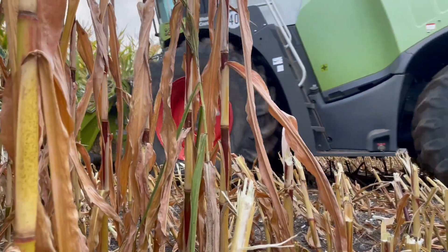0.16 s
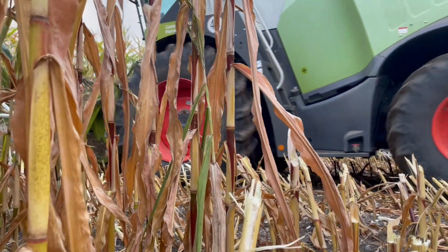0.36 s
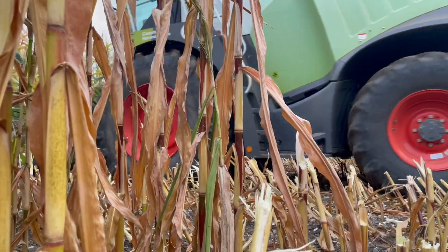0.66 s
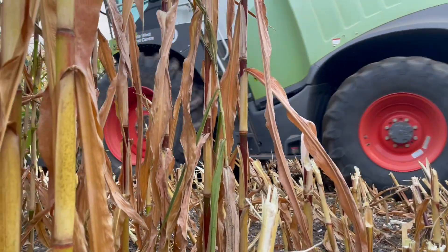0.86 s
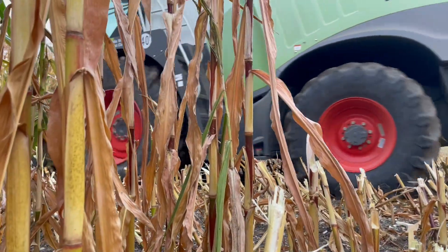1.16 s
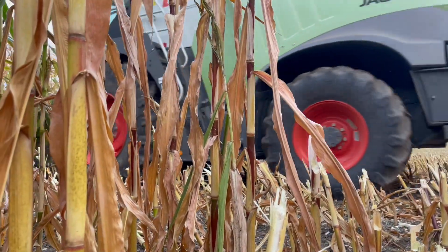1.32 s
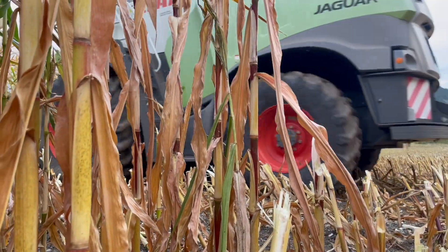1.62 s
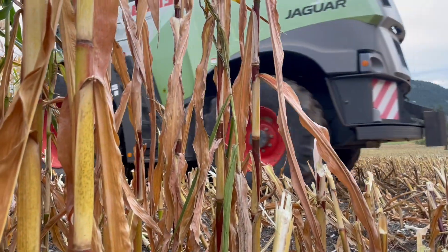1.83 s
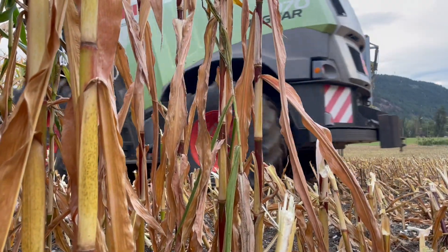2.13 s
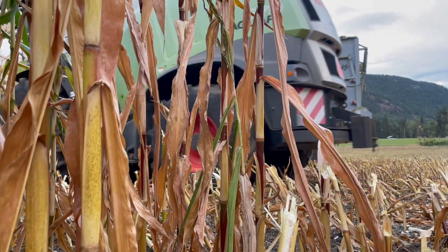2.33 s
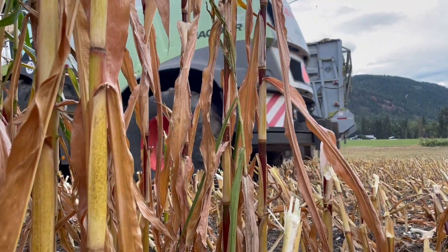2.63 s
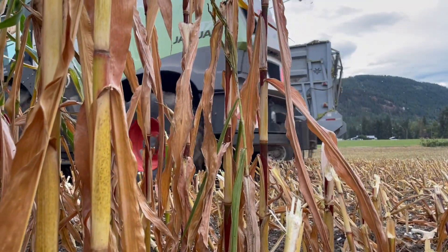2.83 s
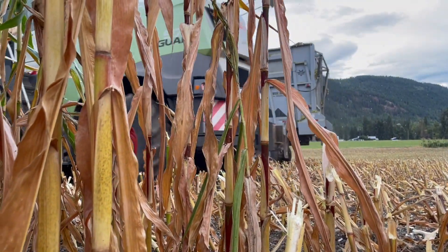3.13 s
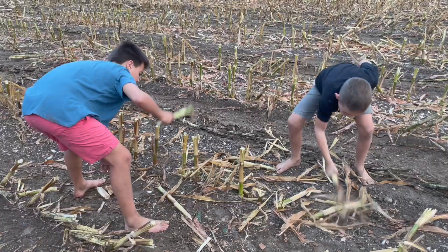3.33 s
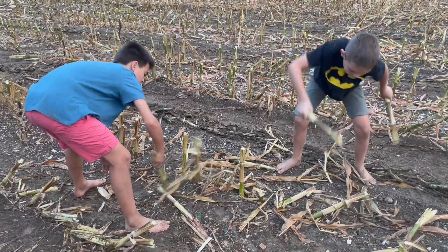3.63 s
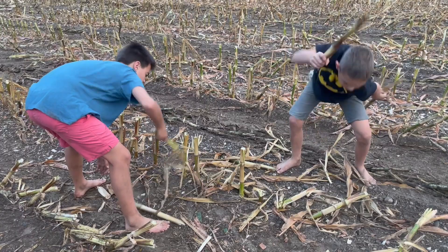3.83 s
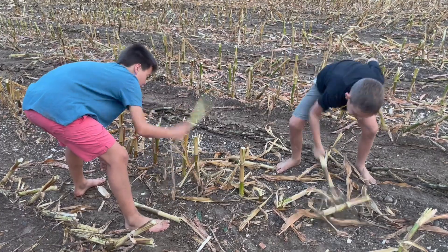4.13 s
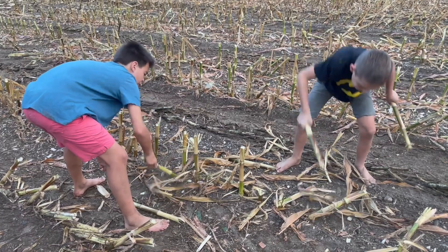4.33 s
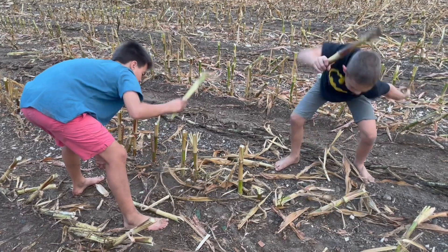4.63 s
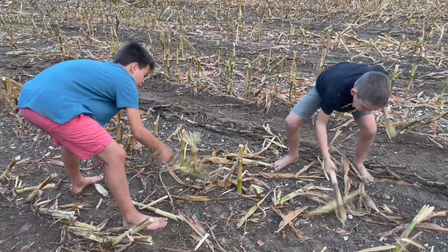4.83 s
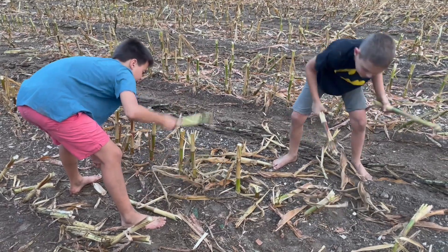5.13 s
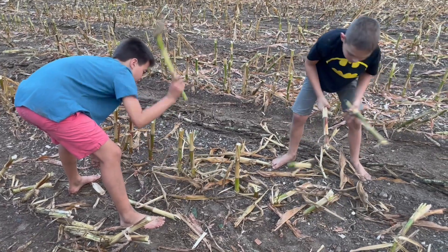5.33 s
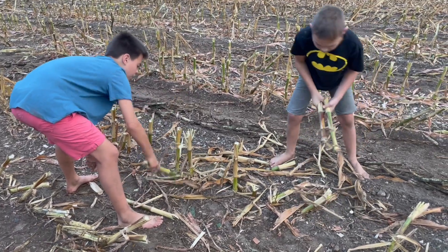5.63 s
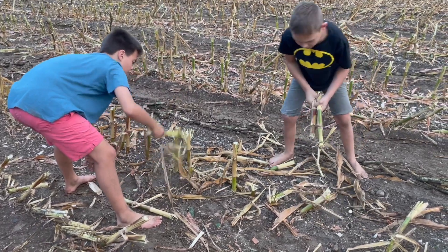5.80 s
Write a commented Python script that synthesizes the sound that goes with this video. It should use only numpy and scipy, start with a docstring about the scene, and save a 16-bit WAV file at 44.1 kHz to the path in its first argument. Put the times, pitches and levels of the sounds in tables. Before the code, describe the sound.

A big harvesting machine drones and howls close by, cuts off abruptly, then dry stalks crack and thud on stubbly soil.

```python
"""Forage harvester, then stalks on stubble

A forage harvester passes close by: sines give the diesel drone and the howl of the knife drum,
shaped noise the rumble, roar and hiss of shredded crop. It ends abruptly. Then dry stalks are beaten
on the soil: noise bursts crack and spray husks, falling tones thud, decaying modes ring, and random
clicks splinter. A far engine of three harmonics hums, squeals glide and a breeze brushes the microphone.
"""
import sys
import numpy as np
from scipy import signal
from scipy.fft import rfft, irfft
from scipy.io import wavfile

SR = 44100
rng = np.random.default_rng(int(sys.argv[2]) if len(sys.argv) > 2 else 0)


def persist_wave(psi):
    """Save psi, clipped to +-1, as 16-bit WAV."""
    counts = np.round(np.clip(psi, -1, 1) * 32767).astype(np.int16)
    wavfile.write(sys.argv[1], SR, np.atleast_2d(counts).T)


N = 262836
TIME = np.arange(N) / SR  # seconds
BINS = np.maximum(np.arange(N // 2 + 1) * SR / N, 1)  # hertz
FIELD_START_S = 3.25

# Stalk blows. Each row: start in seconds, crack level in dB, crack decay constant in seconds, crack treble
# in dB against its body, thud level in dB, contact time in seconds, thud glide constant in seconds,
# stalk ring level in dB, ring pitch as a ratio, place of contact from 0 to 1, stump pitch in Hz,
# stump level in dB.
STALK_BLOWS = [(3.3295, -5, 0.0029, -1, -9, 0.0024, .0024, -24, 0.97, 0.32, 2360, -25),
               (3.6056, -17.5, 0.0045, 0, -31, 0.0027, 0.0026, -33, 1.03, 0.36, 2200, -30),
               (4.0659, -12, 0.0043, 7.5, -6.5, 0.0022, 0.0027, -17, 1.03, 0.02, 1830, -22),
               (4.1711, -12.5, 0.0065, -10, -46, 0.0023, 0.0026, -30, 0.87, 0, 1300, -27),
               (4.8146, -14, 0.006, 8.5, -8, 0.0022, 0.00195, -23, .98, 0.24, 985, -19),
               (5.4262, -14, 0.0042, -2.5, -15.5, 0.0022, 0.0023, -23.5, 0.97, .125, 663, -23)]


def from_db(db):
    """A level in decibels is 20 times the logarithm of an amplitude gain."""
    return 10 ** (np.asarray(db) / 20)


def rms_one(x):
    """Mean-square normalisation gives unit power."""
    return x / np.sqrt(np.mean(x ** 2) + 1e-20)


def in_time(rows):
    """Linear interpolation in time brings each column of a curve to every sample."""
    s, *columns = np.transpose(rows)
    return [np.interp(TIME, s, column) for column in columns]


def in_hz(rows):
    """Interpolation over log frequency brings each column of a spectrum to every bin."""
    hz, *columns = np.transpose(rows)
    return [np.interp(np.log(BINS), np.log(hz), column) for column in columns]


def drift(rate_hz):
    """Low-passed white noise of unit spread wanders at about the given rate."""
    white = rfft(rng.standard_normal(N))
    return rms_one(irfft(white / (1 + (BINS / rate_hz) ** 2), N))


def spread(pair):
    """Mid-side mixing of two unrelated signals sets the stereo coherence at each frequency."""
    # Each row: frequency in Hz, left-right likeness from 0 to 1.
    likeness = [(30, .999), (60, 0.993), (150, 0.98), (350, 0.96), (700, 0.75), (1400, 0.36), (3000, 0.8),
                (5500, 0.27), (7000, 0.7), (8500, 1), (10500, 0.79), (12400, 0.8), (13200, 1)]
    alike = np.clip(in_hz(likeness)[0], 0, 1)
    mid, side = rfft(pair)
    return irfft(np.sqrt(1 + alike) * mid + np.sqrt(1 - alike) * side * [[1], [-1]], N)


def coloured(spectrum, grain_db=0):
    """Spectral shaping colours stereo noise; uneven grain makes it a mass of tiny fractures."""
    sizes = from_db(grain_db * np.clip(drift(900), -2.5, 2.5))
    white = rng.standard_normal((2, N)) * sizes
    return rms_one(spread(irfft(rfft(white) * from_db(in_hz(spectrum)[0]), N)))


def turning(hz):
    """Phase is the running integral of a changing rotation rate."""
    return 2 * np.pi * np.cumsum(hz) / SR


def bell(centre_s, width_s):
    """A Gaussian envelope rises and falls smoothly around a moment."""
    return np.exp(-np.minimum(.5 * ((TIME - centre_s) / width_s) ** 2, 50))


def swells(rows):
    """Incoherent swells add in power; each row is a moment, a half width and a level."""
    return np.sqrt(sum((from_db(db) * bell(s, width)) ** 2 for s, width, db in rows))


def swirl(x, depth, count=4):
    """Comb filtering by sliding echoes off moving panels and the soil makes the colour wander."""
    echoes = 0
    for k in range(count):
        lag_s = .0006 * 1.9 ** k + .00007 * drift(2.5)
        delayed = np.array([np.interp(TIME - lag_s, TIME, channel) for channel in x])
        echoes = echoes + delayed * (-1) ** k
    return rms_one(x + depth * echoes)


def flares(multiple):
    """A Gaussian gain lets one of the drum's tones flare up briefly."""
    # Each row: multiple of the knife rate, centre in seconds, half width in seconds, level in dB.
    tone_flares = [(1, 0.897, 0.057, -17.5), (1, 1.326, 0.036, -21.5), (1, 2, 0.043, -21),
                   (4, 0.71, 0.056, -31), (4, 1.174, 0.062, -29.5), (5, 0.98, .2, -36),
                   (6, 1.54, 0.14, -33.5), (8, 1.7, 0.38, -41)]
    return swells([swell for k, *swell in tone_flares if k == multiple])


def knife_drum(phase, sag_hz, howl_db, smear=.65, flutter_db=4.0, waver_db=.8):
    """Periodic knife passes at the shear bar excite harmonics; uneven feed of crop makes them waver."""
    # Each row: multiple of the knife rate, level in dB relative to the common overtone level.
    overtones = [(3, -8), (4, -1), (5, -3), (6, -4.5), (7, -15.5), (8, -11), (9, -13), (10, -13)]
    labour_db_per_hz = 0.24  # the knife tone grows as a thick wad of crop slows the drum
    knife_db = -26.5 + labour_db_per_hz * sag_hz + 2 * np.clip(drift(1.9), -2, 2)
    upper_db = -35.5 - 1.0 * TIME  # sinks 1 dB per second as the front of the machine moves away
    tones = np.hypot(from_db(knife_db), flares(1)) * np.sin(phase + 0.16 * drift(28.0))
    tones += from_db(howl_db + waver_db * drift(8.5)) * np.sin(2 * phase + 0.027 * drift(1.5))
    for multiple, level_db in overtones:
        steady = from_db(upper_db + level_db + flutter_db * drift(18))
        gain = np.hypot(flares(multiple), steady)
        tones += gain * np.sin(multiple * phase + smear * drift(10.7))
    return np.sqrt(2) * tones  # makes the levels rms


def diesel(wobble=0.55, throb_db=1.5):
    """Cyclic firing makes tones that labour under changing load; a deep drive drone surges above them."""
    # Each row: engine or drive tone in Hz, level in dB before the common 2 dB cut.
    engine_tones = [(133.1, -23), (65.85, -36), (137.4, -32)]
    # Each row: centre of a surge in seconds, level in dB.
    drone_surges = [(.15, -21), (.53, -21), (.77, -17), (1.08, -21), (1.24, -18), (1.54, -18), (2.1, -19.5),
                    (2.84, -19.5), (3.1, -19.5)]
    drone_hz, drone_db, surge_half_width_s = 83.15, -29, 0.034
    tones = 0
    for hz, db in engine_tones:
        gain = from_db(db - 2 + throb_db * drift(7.2))
        tones = tones + gain * np.sin(2 * np.pi * hz * TIME + wobble * drift(4.9))
    surge = swells([(s, surge_half_width_s, db) for s, db in drone_surges])
    drone = np.sin(2 * np.pi * drone_hz * TIME + wobble * drift(6.9))
    return np.sqrt(2) * (tones + np.hypot(from_db(drone_db), surge) * drone)


def whistles(flutter_db=3):
    """Frequency modulation by noise blurs the thin whistles of fast-turning parts."""
    # Each row: settled pitch in Hz, wander in Hz, level in dB.
    whistle_tones = [(3450, 38.8, -46.5), (5160, 105.9, -52), (11770, 117, -49.5), (13020, 131, -47.5)]
    speed = 1 - .02 * bell(0, .7)  # starts 2 % low and picks up over about 0.7 s
    tones = 0
    for hz, wander_hz, db in whistle_tones:
        phase = turning(hz * speed + wander_hz * drift(146.0))
        tones = tones + from_db(db + flutter_db * drift(3.4)) * np.sin(phase)
    return np.sqrt(2) * tones


def panels():
    """Hollow panels resonate in the rush of crop, each heard while it faces the microphone."""
    # Each row: resonance in Hz, bandwidth in Hz, centre in seconds, half width in seconds, level in dB.
    resonances = [(1670, 160, 1.8, 0.43, -41), (2620, 110, 1.72, 0.3, -35), (3420, 120, 1.076, 0.18, -40),
                  (3600, 227, 1.9, .2, -47), (5330, 380, 2.01, 0.063, -39.5), (3410, 161, 2.58, 0.15, -39),
                  (4500, 140, 2.8, 0.14, -38.5), (4930, 130, 2.9, .1, -54), (2540, 150, 2.85, 0.17, -39)]
    rush, out = spread(rng.standard_normal((2, N))), 0
    for hz, width_hz, s, width_s, db in resonances:
        ringing = signal.lfilter(*signal.iirpeak(hz, hz / width_hz, fs=SR), rush)
        out = out + from_db(db) * bell(s, width_s) * rms_one(ringing)
    return out


def machine_rumble():
    """Band-shaped noise of varying level is the machine's rumble."""
    # Each row: frequency in Hz, relative level per hertz in dB.
    rumble_colour = [(22, -29), (32, -24), (42, -6.5), (70, -2), (90, -2.5), (115, 0), (160, -2), (230, -4),
                     (330, -13), (480, -20), (900, -56.5)]
    # Each row: time in seconds, rumble level in dB.
    rumble_level = [(0, -16), (.7, -17.5), (1.3, -15.5), (1.75, -17.5), (2.15, -16), (2.55, -18.5),
                    (2.8, -18.5), (3.05, -17.5)]
    return from_db(in_time(rumble_level)[0]) * coloured(rumble_colour)


def machine_roar(cuts):
    """Amplitude modulation by the cuts pulses a broad-band roar."""
    # Each row: frequency in Hz, relative level per hertz in dB.
    roar_colour = [(250, -7.5), (450, -3), (590, 1), (720, -1.5), (870, -8.5), (1100, -8), (1330, -16),
                   (1650, -11.5), (2100, -15.5), (2600, -14), (3050, -20.5), (3500, -17), (4400, -24.5),
                   (7000, -79)]
    level_db = -21.5 + .5 * TIME  # rises half a decibel per second
    return from_db(level_db) * swirl(coloured(roar_colour, grain_db=1.5), depth=0.11) * cuts


def crop_hiss(cuts):
    """Amplitude modulation makes shredded crop hiss in step with the knives; it swells in passing."""
    # Each row: frequency in Hz, relative level per hertz in dB.
    hiss_colour = [(2500, -2), (4000, 5.5), (5000, 3), (5600, 0), (7500, -3), (10500, 6.5), (12600, 2),
                   (13300, -1.5), (14500, -18), (15600, -49)]
    level_db = -34 + 2 * bell(1.36, 0.33)  # 2 dB more as the crop stream is nearest
    return from_db(level_db) * swirl(coloured(hiss_colour, grain_db=3.0), depth=0.76) * cuts


def fan_rush():
    """Turbulent air is broad-band noise, louder as each cooling grille comes into line."""
    # Each row: frequency in Hz, relative level per hertz in dB.
    fan_colour = [(1500, -20), (2200, -6), (2620, 7.5), (3000, -3), (3480, -3), (4100, -7), (5000, -0.5),
                  (5700, -2.5), (7200, 4.5), (8600, -7.5), (10500, -5), (14000, -32)]
    # Each row: centre in seconds, half width in seconds, level in dB.
    grilles = [(2.74, 0.18, -30.5), (3.17, 0.14, -35.5)]
    return np.hypot(from_db(-39), swells(grilles)) * swirl(coloured(fan_colour), depth=0.37)


def harvester(chop=0.046):
    """Superposition of tones and noise, tied by the knives' shared phase, forms the machine."""
    # Knife drum. Each row: time in seconds, knives passing per second, level in dB of the howl at
    # twice that rate.
    drum = [(0, 196, -18), (.17, 201, -18), (.32, 195, -19), (.37, 198.2, -28), (.46, 198.2, -20.5),
            (.73, 197, -18.5), (.97, 195.5, -27.5), (1.13, 198, -35), (1.38, 197.8, -25.5),
            (1.62, 196, -22), (2.0, 197, -20), (2.35, 200, -20), (2.52, 198.7, -21.5), (2.8, 195.3, -20),
            (2.95, 196, -27.5), (3.2, 192, -30)]
    pass_end_s = 3.204
    knife_hz, howl_db = in_time(drum)
    phase = turning(knife_hz)
    cuts = 1 + chop * np.cos(2 * phase)
    tones = knife_drum(phase, knife_hz.mean() - knife_hz, howl_db) + diesel() + whistles()
    noises = machine_rumble() + machine_roar(cuts) + panels() + crop_hiss(cuts) + fan_rush()
    return (tones + noises) * np.clip((pass_end_s - TIME) / 0.00053, 0, 1)


def from_right(x, lag_s=0.0005):
    """Interaural-style delay: sound from the right reaches the left port a little later."""
    return np.array([np.interp(TIME - lag_s, TIME, x), x])


def far_engine(age, second_db=-52):
    """A harmonic series on a slowly rising firing rate makes the far engine's hum."""
    # Each row: time in seconds, level in dB of the fundamental.
    hum_level = [(3.25, -59), (3.78, -57), (3.87, -36.5), (4.5, -38.5), (4.8, -41.5), (5.2, -32.5),
                 (5.5, -53), (5.96, -40)]
    phase = turning(51.9 + 1.4 * age)  # firing rate in Hz, rising 1.4 Hz per second
    third_db = -46 - 6.5 * age  # fades 6.5 dB per second
    hum = 0
    for k, db in enumerate([in_time(hum_level)[0], second_db, third_db], 1):
        hum = hum + from_db(db) * np.sin(k * phase + 0.24 * drift(9.8))
    return np.sqrt(2) * from_right(hum)


def squeals(waver=0.018, flutter_db=3.0):
    """Frequency modulation makes thin far tones waver; each sets in, glides and dies."""
    # Each row: start in seconds, length in seconds, pitch in Hz, glide in Hz per second, level in dB.
    squeal_rows = [(3.775, 0.115, 1600, 350, -64), (4.01, 0.054, 2190, 200, -67),
                   (5.813, 0.16, 1835, -100, -61)]
    # Each row: partial's pitch ratio, level in dB relative to the squeal's level.
    partials = [(1, 2), (1.365, -8)]
    edge_s = 0.015  # onset and end
    out = 0
    for s, length_s, hz, glide, level_db in squeal_rows:
        age = np.clip(TIME - s, 0, length_s)
        phase = turning((hz + glide * age) * (1 + waver * drift(70)))
        tones = sum(from_db(db + flutter_db * drift(50)) * np.sin(ratio * phase) for ratio, db in partials)
        envelope = np.minimum(np.minimum(age, length_s - age) / edge_s, 1)
        out = out + from_db(level_db) * envelope * tones
    return np.sqrt(2) * out


def breeze_and_distance(age):
    """Turbulence at the microphone is low noise in gusts, over the wider noise of the open field."""
    # Each row: centre of a gust in seconds, half width in seconds, level in dB.
    gust_rows = [(4.25, 0.088, -44), (4.92, 0.043, -28), (5.08, 0.091, -30.5), (5.45, 0.12, -39.5),
                 (5.88, 0.13, -36)]
    # Each row: frequency in Hz, relative level per hertz in dB.
    wind_colour = [(20, -30), (30, -21), (44, 6), (60, 1), (110, 4.5), (160, -10), (250, -37), (500, -36),
                   (1200, -59)]
    # Each row: frequency in Hz, relative level per hertz in dB.
    field_colour = [(25, -16), (55, 1), (110, 4), (200, -11.5), (300, -15.5), (480, -12.5), (800, -17.5),
                    (1200, -23.5), (1750, -23.5), (2500, -33), (6000, -35.5), (12000, -40), (16000, -47)]
    gust = swells(gust_rows)
    breeze = gust * from_db(0.88 * drift(12)) * coloured(wind_colour)
    calm_db = -47.5 + 1.0 * age  # grows 1 dB per second along with the far engine
    field_gain = from_db(calm_db) + from_db(-24.5) * gust
    return breeze + field_gain * swirl(coloured(field_colour), depth=0.12)


def open_field():
    """Superposition of far engine, squeals, breeze and distant noise forms the background."""
    age = np.maximum(TIME - FIELD_START_S, 0)
    return far_engine(age) + squeals() + breeze_and_distance(age)


def burst(start_s, decay_s):
    """Exponential relaxation follows a sudden release of energy."""
    age = np.maximum(TIME - start_s, 0)
    return (1 - np.exp(-age / .0004)) * np.exp(-np.minimum(age / decay_s, 50))


def thud(start_s, swell_s, glide_s, end_hz, start_hz=1200, crumble=0.49):
    """An impact on yielding soil drops in pitch within milliseconds, unevenly as the soil crumbles."""
    age = np.maximum(TIME - start_s, 0)
    cycles = end_hz * age + (start_hz - end_hz) * glide_s * (1 - np.exp(-age / glide_s))
    push = age / swell_s * np.exp(1 - age / swell_s)  # peaks at swell_s
    return push * np.sin(2 * np.pi * cycles + crumble * drift(510))


def thuds():
    """Impulsive loading makes the soil thud under blows and soft landings; it radiates little deep bass."""
    # Stalk ends and feet landing softly. Each row: start in seconds, level in dB, final pitch in Hz.
    knocks = [(3.368, -23, 310), (3.616, -23, 247), (4.21, -23.5, 217), (5.051, -34, 129.6),
              (5.515, -31.5, 254)]
    soil_lag_s = 0.00056  # the soil is reached just after the crack
    out = 0
    for s, _, _, _, thud_db, contact_s, glide_s, *_ in STALK_BLOWS:
        out = out + from_db(thud_db) * thud(s + soil_lag_s, 2 * contact_s, glide_s, end_hz=158.3)
    for s, db, hz in knocks:
        out = out + from_db(db) * thud(s, 0.0028, 0.00042, hz, start_hz=580)
    return signal.sosfilt(signal.butter(2, 95, "high", fs=SR, output="sos"), out)


def stalk_ring(uneven_db=0.5):
    """Modal excitation depends on the place struck; the grip shifts the pitch and the stump adds a knock."""
    # Hollow maize stalk. Each row: mode in Hz before the blow's pitch ratio, relative level in dB,
    # time to fall 60 dB in seconds.
    stalk_modes = [(490, -3, 0.032), (690, -4, 0.046), (940, -9, 0.045), (1368, 3, 0.023),
                   (1980, 2.5, 0.049), (2285, -3, 0.028), (2690, 2, 0.024), (3690, 3, 0.028),
                   (4430, -8, 0.016)]
    node_share = 0.27  # what is left of a mode struck at its node
    stump_t60_s, crush_s = 0.05, .0006  # crush: time for the fibres to give way
    out, age = np.zeros(N + SR), TIME[:SR // 2]
    hz, db, t60 = np.transpose(stalk_modes)[:, :, None]
    mode = np.arange(1, len(stalk_modes) + 1)[:, None]
    for s, *_, ring_db, pitch, place, stump_hz, stump_db in STALK_BLOWS:
        uneven = uneven_db * rng.standard_normal(hz.shape)
        struck = np.hypot(np.sin(np.pi * mode * place), node_share) * from_db(ring_db + db + uneven)
        modes = struck * from_db(-60 * age / t60) * np.sin(2 * np.pi * hz * pitch * age)
        stump = from_db(stump_db - 60 * age / stump_t60_s) * np.sin(2 * np.pi * stump_hz * age)
        first = int(s * SR)
        out[first:first + len(age)] += (modes.sum(axis=0) + stump) * (1 - np.exp(-age / crush_s))
    return out[:N]


def ticks(spectrum, per_s=800, size_db=4.0):
    """A Poisson-like train of clicks: dry fibres break at random moments with widely different sizes."""
    born = rng.random(N) < per_s / SR
    sizes = from_db(size_db * np.minimum(rng.exponential(1, N), 3))
    clicks = born * rng.standard_normal((2, N)) * sizes
    return rms_one(spread(irfft(rfft(clicks) * from_db(in_hz(spectrum)[0]), N)))


def cracks():
    """Brittle fracture is a brief noise burst; a crossover sets each blow's treble against its body."""
    # Each row: frequency in Hz, relative level per hertz in dB.
    crack_colour = [(150, -28), (400, -14), (800, -8.5), (1200, -3), (1900, 0), (2700, 3), (3700, -5),
                    (5000, -2), (5700, -8.5), (7500, -2.5), (10000, -1), (12500, -4.5), (16000, -21)]
    body, edge = 0, 0
    for s, crack_db, decay_s, treble_db, *_ in STALK_BLOWS:
        crack = from_db(crack_db) * burst(s, decay_s)
        body, edge = body + crack, edge + from_db(treble_db) * crack
    fibres = rms_one(coloured(crack_colour, grain_db=2.0) + 0.22 * ticks(crack_colour, per_s=1300))
    dull = irfft(rfft(fibres) / (1 + (BINS / 4000) ** 6), N)
    return body * dull + edge * (fibres - dull)


def leaves():
    """Friction sets the level of dry litter: stirs build up and let go, and each blow leaves it settling."""
    # Each row: peak in seconds, build-up half width in seconds, level in dB.
    rustles = [(3.902, 0.023, -43), (4.13, 0.046, -42), (4.33, 0.19, -52), (4.5, 0.082, -46.5),
               (5.08, 0.13, -48), (5.33, 0.03, -52), (5.526, 0.021, -39), (5.69, 0.029, -49.5),
               (5.8, 0.058, -47.5), (5.89, .04, -57)]
    release_s = 0.017
    stirs = swells([(s, np.where(TIME < s, build_s, release_s), db) for s, build_s, db in rustles])
    settling = from_db(-51) * sum(burst(s, 0.088) for s, *_ in STALK_BLOWS)
    return np.hypot(from_db(-59.5), stirs) + settling  # a faint stirring never stops


def husk_spray(litter, uneven_db=2.0, tick_db=-5, spray_db=-2):
    """Many small collisions make granular noise: husks spray, splinters snap and leaves rustle."""
    # Each row: frequency in Hz, relative level per hertz in dB.
    husk_colour = [(100, 3), (230, 5), (500, 1), (1000, -5), (2200, 0), (3500, -3), (5700, -4), (7500, -1),
                   (10000, 3), (12500, 0.5), (16000, -15)]
    # Louder splinters. Each row: start in seconds, level in dB, decay constant in seconds.
    snaps = [(3.341, -14.5, 0.009), (3.368, -21.5, 0.0031), (3.375, -26, 0.0018), (3.6164, -10.5, 0.0045),
             (3.637, -24, 0.0064), (3.647, -29, 0.0035), (3.881, -30.5, 0.0041), (4.0863, -24, 0.0045),
             (4.135, -43, 0.0011), (4.184, -21, 0.011), (4.207, -34, 0.004), (4.441, -44, .002),
             (4.65, -50, 0.0012), (4.796, -28.5, 0.014), (4.8509, -18, 0.0013), (5.1605, -31.5, 0.0014),
             (5.3035, -37.5, .0019), (5.451, -37, 0.0023), (5.473, -29.5, 0.0041), (5.572, -39, 0.0013)]
    gain = litter * from_db(uneven_db * drift(61))
    for s, _, decay_s, *_ in STALK_BLOWS:
        gain = gain + from_db(-26) * burst(s, 3.9 * decay_s)  # outlasts the crack 3.9 times
    for s, db, decay_s in snaps:
        gain = gain + from_db(db) * burst(s, decay_s)
    spray = from_db(spray_db) * coloured(husk_colour, grain_db=1.0)
    return gain * (spray + from_db(tick_db) * ticks(husk_colour))


def splinters(size_db=2.0, clump_db=4, count=16):
    """Impulses ring damped resonators: splinters snap in clumps, with varied size, pitch and place."""
    per_s, low_hz, high_hz = 420, 1220, 12100
    low_t60_s = 0.0032  # of the lowest pitch; higher ones die faster in proportion
    born = rng.random(N) < per_s * from_db(clump_db * np.clip(drift(25), -2, 2)) / SR
    sizes = from_db(size_db * np.minimum(rng.exponential(1, N), 3))
    clicks = born * sizes * rng.standard_normal((2, N))
    dealt, out = rng.integers(0, count, N), 0
    for k, hz in enumerate(np.geomspace(low_hz, high_hz, count)):
        radius = from_db(-60 * hz / (low_hz * low_t60_s * SR))
        angle = 2 * np.pi * hz / SR
        poles = [1, -2 * radius * np.cos(angle), radius * radius]
        struck = clicks * (dealt == k) + 1e-18  # the offset avoids denormal numbers
        out = out + signal.lfilter([0, np.sin(angle)], poles, struck) * np.sqrt(hz)
    return rms_one(spread(out))


def scrapes(grain_db=2.5):
    """Sliding friction makes a dull, gritty rub as stalks and feet drag over the soil."""
    # Each row: centre in seconds, half width in seconds, level in dB.
    drags = [(4.46, 0.035, -54), (5.0, .06, -53.5), (5.524, 0.011, -46), (5.87, .09, -54)]
    # Each row: frequency in Hz, relative level per hertz in dB.
    soil_colour = [(300, -25), (650, -6), (950, -1), (1200, -3), (1500, 0), (2100, -5), (3500, -8),
                   (7000, -30)]
    return swells(drags) * coloured(soil_colour, grain_db=grain_db)


def stalks():
    """Superposition of fracture, impact, ringing and friction forms the beaten stalks."""
    litter = leaves()
    blows = cracks() + thuds() + stalk_ring()
    return blows + husk_spray(litter) + from_db(-7) * litter * splinters() + scrapes()


def scene():
    """Two scenes in succession: the passing machine, a very short gap, then the stubble field."""
    field_gain = np.clip((TIME - FIELD_START_S) / 0.0029 + 1, 0, 1)
    return harvester() + (open_field() + stalks()) * field_gain


def record(dry):
    """Linear filtering and soft saturation: ports differ, deep bass and top are cut, peaks are rounded."""
    # Microphone ports. Each row: frequency in Hz, left lead in radians, left minus right in dB.
    port_rows = [(20, 0, 0), (60, 0, -.3), (250, 0, -1.5), (480, .1, -2.5), (640, .5, -3), (850, .9, 1.8),
                 (1200, .3, 2.2), (1500, -.6, 2.6), (2050, -.3, .8), (2900, .9, 2.3), (4200, .7, 2.9),
                 (5200, .6, 2), (5800, -1.7, .3), (6500, -1, 0), (7600, -2.9, 0), (9000, -3.25, 0),
                 (10500, -4.3, 0), (13000, -6.28, 0)]
    lead, balance_db = in_hz(port_rows)
    ports = np.array([np.exp(1j * lead) * from_db(balance_db / 2), from_db(-balance_db / 2)])
    eased = dry * np.minimum(TIME / .005, 1)
    low_cut = 1 / np.sqrt(1 + (33 / BINS) ** 10)  # corner at 33 Hz
    heard = irfft(rfft(eased) * ports * low_cut, N)
    rounded = heard / (1 + (heard / .8) ** 4) ** .25  # approaches a ceiling of 0.8
    return signal.sosfilt(signal.ellip(10, .1, 80, 15900, fs=SR, output="sos"), rounded)


dry = scene()
out = record(dry)
persist_wave(out)
```